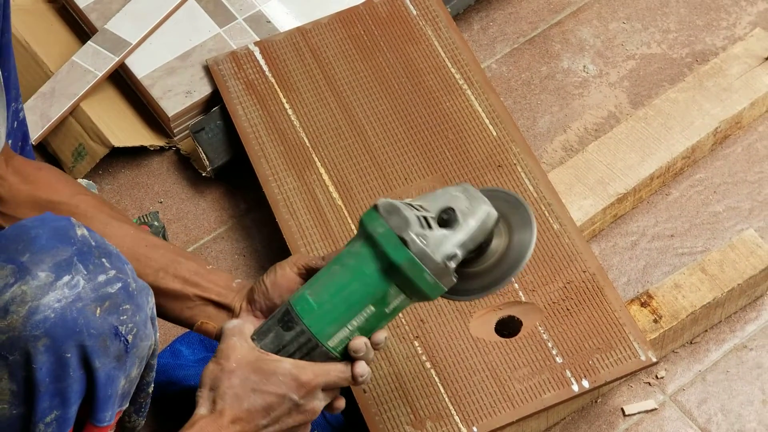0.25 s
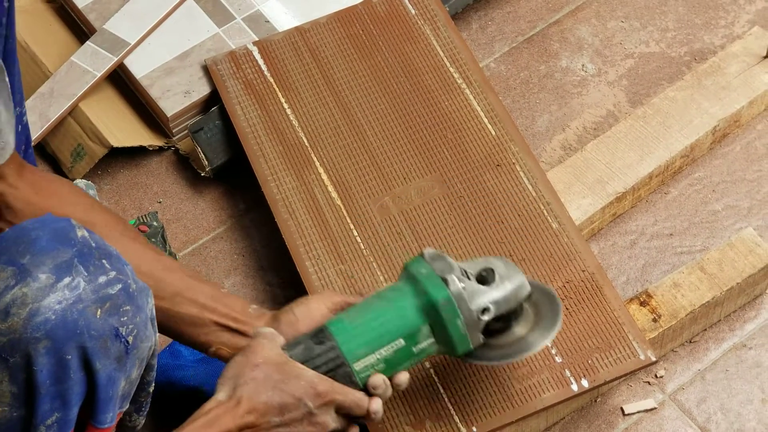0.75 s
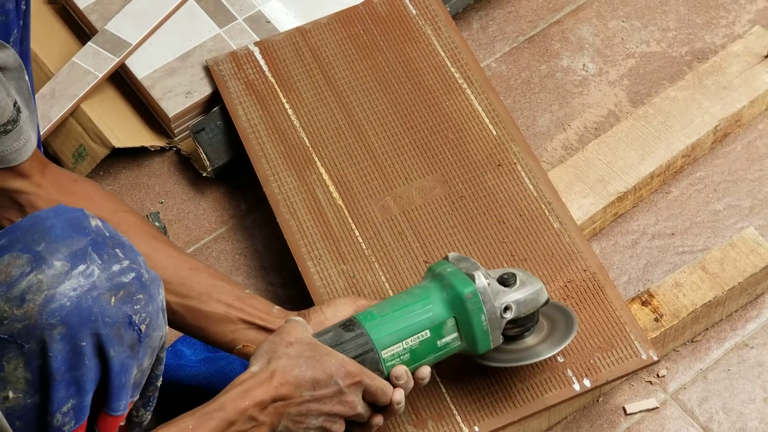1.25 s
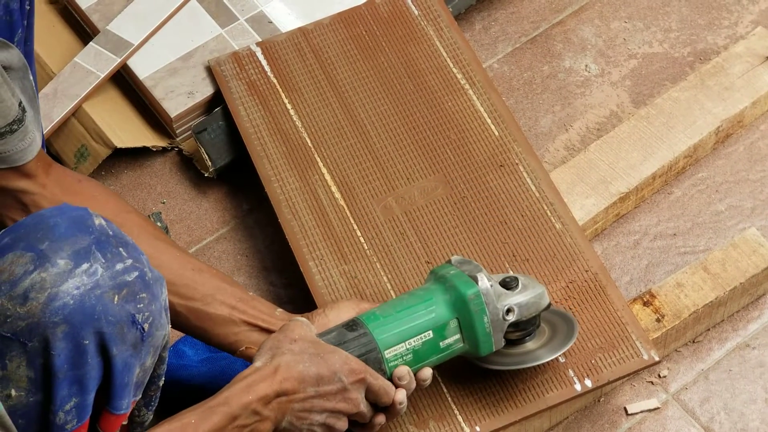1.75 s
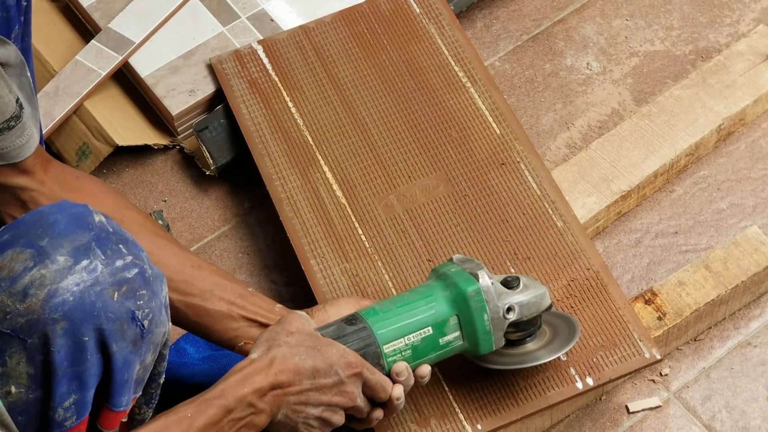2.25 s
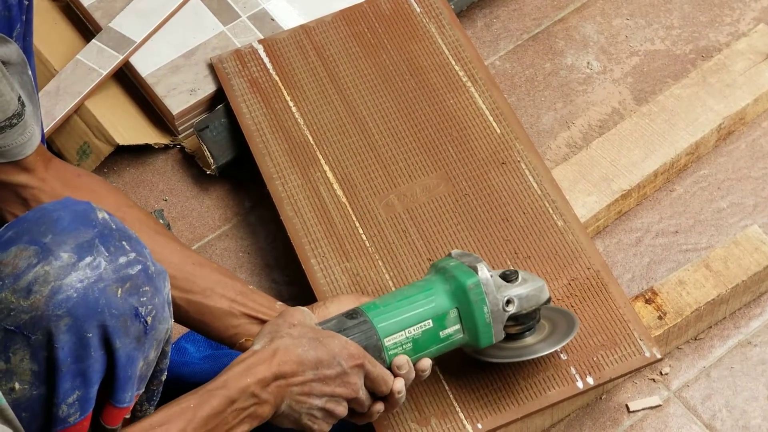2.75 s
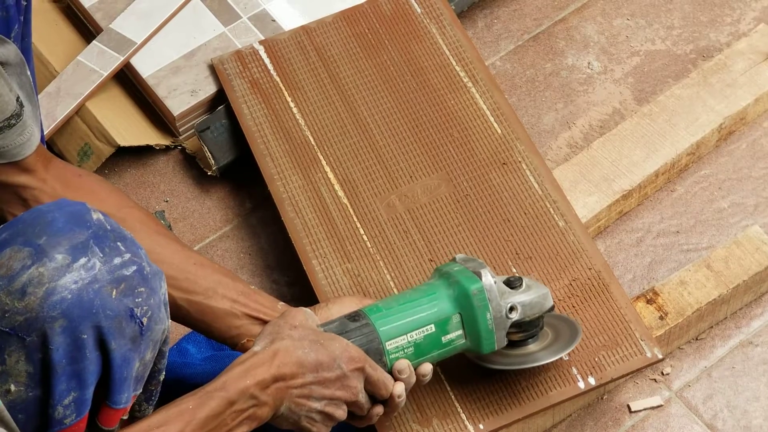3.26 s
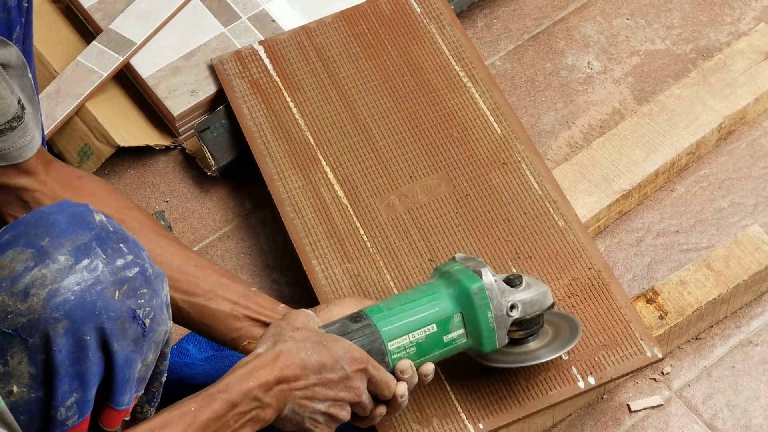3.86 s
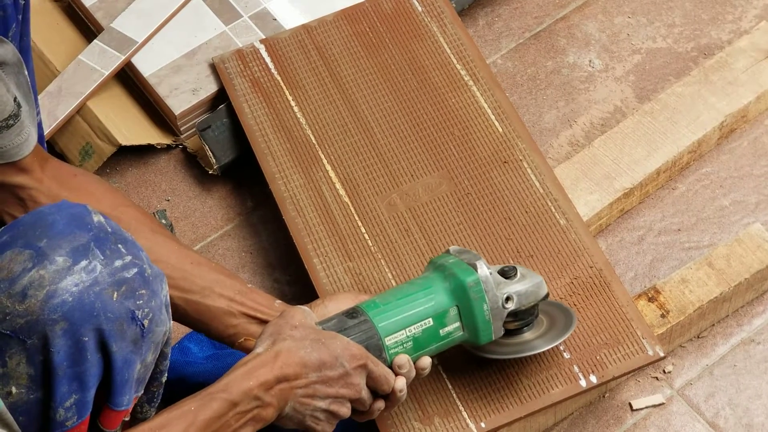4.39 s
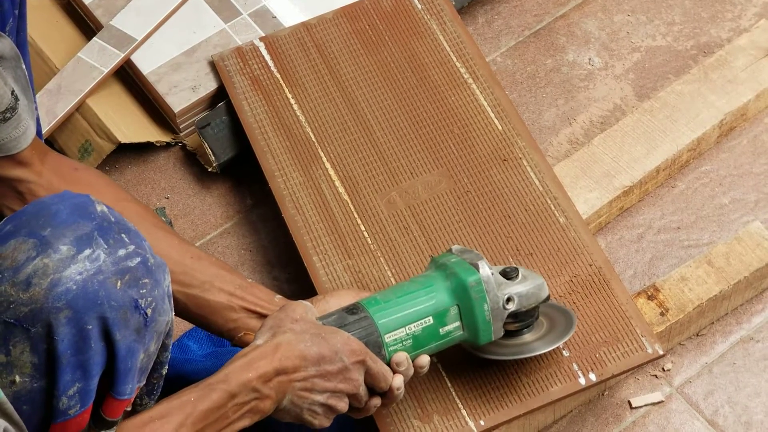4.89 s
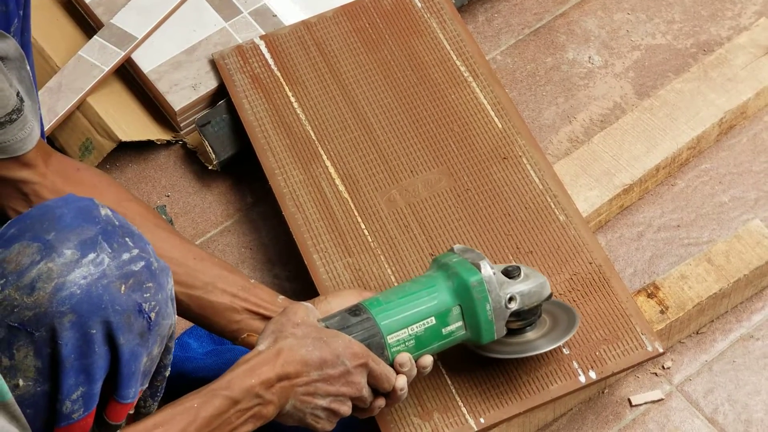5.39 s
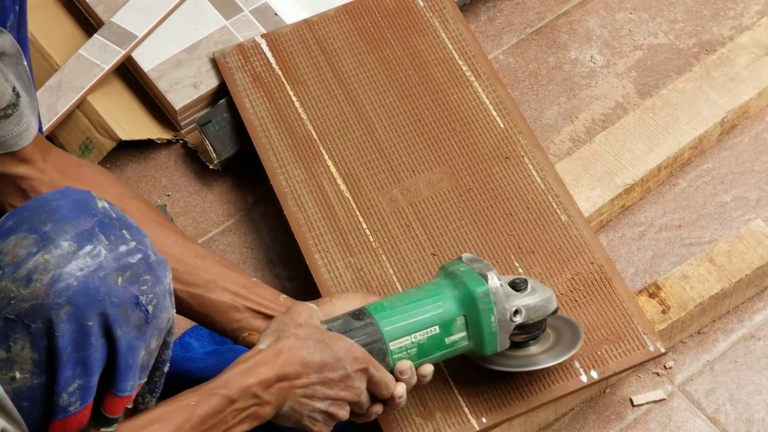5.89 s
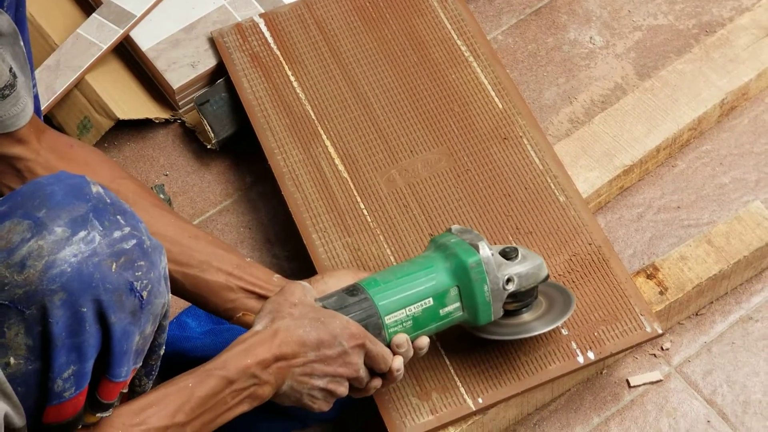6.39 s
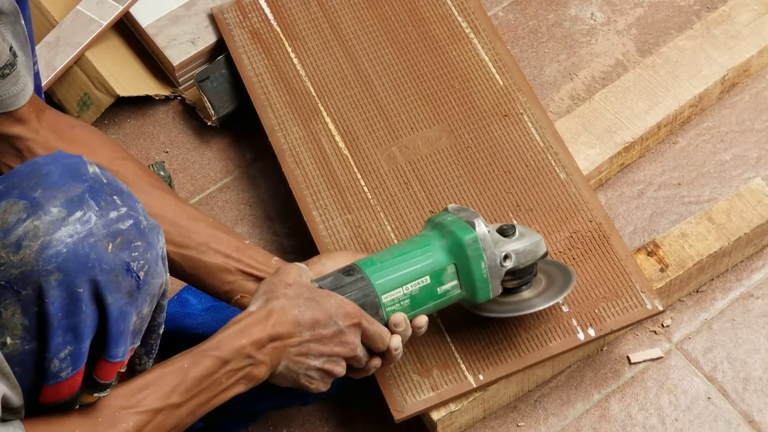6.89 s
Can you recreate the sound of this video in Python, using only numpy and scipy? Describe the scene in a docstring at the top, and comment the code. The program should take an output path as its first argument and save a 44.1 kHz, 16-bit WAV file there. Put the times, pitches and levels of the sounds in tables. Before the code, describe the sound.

Close by, loose gears tick and rattle before an angle grinder kicks on and whines quickly up to speed. After a moment of free running, the disc bites into a ceramic tile in seven passes of uneven length, the last ones short. Each brings bright, gritty scraping, a metallic ring and a faint drone from the tile. The motor sags slightly under load and its fan rushes through the gaps, in a fairly dry space.

```python
"""Angle grinder on a floor tile

A hand-held grinder coasts with rattling gears, is switched on with a knock and spins up.
Its disc is then pressed seven times on a ceramic tile: grit scrapes, the steel disc rings
and the tile judders and drones, while the motor sags under the load and its fan keeps rushing."""
import sys
import numpy as np
from scipy import signal
from scipy.fft import rfft, irfft, next_fast_len
from scipy.io import wavfile

SR = 44100
rng = np.random.default_rng(int(sys.argv[2]) if len(sys.argv) > 2 else 0)


def unload_audio(sound):
    """Save the sound as a 16-bit wav file, at the path given as the first command line argument."""
    columns = np.transpose(np.atleast_2d(sound))
    # keep every value between -1 and 1, then stretch to whole-number steps
    steps = np.round(np.clip(columns, -1, 1) * 32767)
    wavfile.write(sys.argv[1], SR, steps.astype(np.int16))


N = 314874
TIME = np.arange(N) / SR

# Passes over the tile; levels in all tables are relative, set before the mix:
# (lands [s], lifts [s], landing [dB], time to bite [s], scrape [dB], squeal over scrape [dB],
#  skating time [s], judder [dB], bounce over judder [dB], drone [dB], drone loudest at [s])
PASSES = [ (1.448, 2.068, -16, 0.27, -21.5, -19, 0.33, -34, -2.5, -42.5, 1.55),
          (2.37, 3.276, -3, 0.15, -19.5, -9.5, 0.18, -37, 9, -43.5, 3.08),
          (3.569, 3.861, -9, 0.11, -22, -12.5, 0.18, -37, 6, -51, 3.68),
          (4.086, 4.985, -12, 0.18, -20, -5, .42, -36, -2, -41.5, 4.44),
          (5.242, 5.884, -10, 0.072, -19, -8, 0.25, -39.5, 13.5, -40.5, 5.42),
          (6.2983, 6.577, -2, 0.014, -20.5, -6, 0.22, -42, 11, -38, 6.58),
          (6.927, 7.2, -4, 0.01, -20, -9, 0.19, -37.5, 0.5, -70, 6.98), ]
# the hand leans harder on the tool: (time [s], length [s], extra scrape [dB])
PRESSES = [(1.855, 0.14, 2), (3.2, 0.15, 2.5), (3.783, 0.064, 3.5), (4.89, .08, 2), (5.316, 0.023, 1.5),
           (5.77, 0.046, 5.5), (6.518, 0.067, 4.5), (7.046, 0.068, 5)]
# the rim catches on the tile: (time [s], level [dB])
CATCHES = [(1.9592, -5), (4.215, -4), (5.3228, -10)]
# disc speed at work, sagging under load: (time [s], speed [turns/s])
WORK_SPEED = [(1.45, 181.4), (1.7, 182), (2.05, 181.3), (2.35, 183), (2.6, 181.4), (3.0, 181.2),
              (3.3, 178.6), (3.57, 184), (3.87, 179), (4.12, 183), (4.4, 179.6), (4.62, 173.5), (4.86, 170),
              (5.27, 177.6), (5.87, 171.3), (6.38, 181.2), (6.6, 178.3), (6.95, 182)]
# tone of the scraping grit: (frequency [Hz], level [dB])
SCRAPE_SPECTRUM = [(100, -78), (250, -46), (400, -32), (900, -34), (1500, -5.5), (2300, 0), (3000, 1.5),
                   (4400, 14), (5200, 6), (6500, -31.5), (8000, -30.5), (10500, -4.5), (13000, -3.5),
                   (16000, -16)]
# ring of the steel disc: (frequency [Hz], width [Hz], level [dB])
DISC_MODES = [(2243, 37, -18), (2391, 69, -10.5), (3385, 33, -18), (3594, 29, 2), (3815, 35, -4.5),
              (3800, 24, -15), (4254, 85, -7), (4630, 94, -12), (4480, 128, 0.5), (4884, 31, -0.5),
              (5590, 73, 3.5), (6106, 60, -11.5), (6646, 65, -10), (7180, 54, -5.5), (8080, 120, -16.5),
              (8545, 63, -10), (9310, 37, -5), (10040, 98, -15), (10990, 56, -10), (12043, 37, 0.5),
              (13850, 150, -3), (13650, 110, -8.5), (14600, 48, -17), (15024, 45, -13), (15700, 110, -7)]
# squeal of the biting disc: (frequency [Hz], width [Hz], level [dB])
SQUEAL_MODES = [(2210, 110, -4.5), (2390, 49, -11)]
# rasp of the labouring disc: (frequency [Hz], width [Hz], level [dB])
RASP_MODES = [(1463, 43, 2.5), (1637, 50, -0.5)]
# dull ring of the tile on its battens: (frequency [Hz], width [Hz], level [dB])
TILE_MODES = [(339.7, 16.4, -8.5), (475, 22, -11), (536, 8.7, 5), (652, 60, -2.5), (714, 13, -4.5),
              (810, 16, -7), (939, 41, -8), (1025, 41, 4), (1280, 58, 5), (1445, 89, -0.5), (1720, 59, -29)]
# overtones of the disc's wobble: (order [cycles/turn], level [dB])
WOBBLE_ORDERS = [(2, -15.5), (5, -9), (7, -11), (8, -6), (12, -2.5)]
# gear teeth slam together: (time [s], level [dB])
KNOCKS = [(0.0543, -22), (0.1328, -24), (0.2154, -0.5), (0.297, -4), (0.3339, -18), (0.3974, -9),
          (0.5294, -11), (0.57, -10), (0.5774, -2.5), (0.72, -6), (0.7586, -10)]
# rattle of case, pinion and dry clatter, a row each:
# (coasting [dB], sets in [s], attack [s], under torque [dB], release [dB/s], settled [dB])
RATTLES = [(-38, 0.222, 0.033, -21, 50, -55), (-38, 0.348, 0.029, -28, 28, -64),
           (-47, 0.218, 0.034, -34, 23.5, -60)]
# ring of the gear case: (frequency [Hz], width [Hz], level [dB])
CASE_MODES = [(730, 84, -17), (2130, 370, -7), (4264, 120, 6.5), (4380, 100, 6)]
# high ring of the pinion: (frequency [Hz], width [Hz], level [dB])
PINION_MODES = [(12240, 300, 7), (12350, 270, -11), (15470, 410, -11)]
# dull ring of the motor housing: (frequency [Hz], width [Hz], level [dB])
HOUSING_MODES = [(694, 66, -2), (1250, 270, 0), (2000, 650, 5)]
# tone of the dry gear clatter: (frequency [Hz], level [dB])
CLATTER_SPECTRUM = [(40, -20), (200, -23), (400, -14.5), (700, -5.5), (1300, -6.5), (2000, -4.5),
                    (3300, 4.5), (4800, 4), (7000, -4.5), (10500, -8), (12700, -32), (14500, -7),
                    (16000, -6.5)]
# tone of the fan's air: (frequency [Hz], level [dB])
FAN_SPECTRUM = [(40, -42), (100, -41), (200, -34.5), (330, -20.5), (600, -14.5), (1200, -12), (2100, -3),
                (3100, 1.5), (4600, -2.5), (7800, -18), (10500, -18), (12200, -9), (16000, -15)]
# sound common to both microphone ports: (frequency [Hz], share of power [0-1])
STEREO_LIKENESS = [(100, 0.32), (450, 0.75), (1000, 0.71), (2200, 0.52), (4200, 0.77), (8000, 0.23),
                   (13000, 0.34)]
# balance of the ports: (frequency [Hz], left over right [dB])
STEREO_BALANCE = [(60, 2.3), (110, 1.6), (200, 4.3), (380, 5.9), (700, 6.6), (1290, 4.6), (2380, 0.44),
                  (4400, 3.6), (8120, 5.4), (15000, 4.3)]
# phase between the ports: (frequency [Hz], left leads by [rad])
STEREO_PHASE = [(600, .1), (1300, -1), (2000, -.3), (2400, -.8), (2900, 2.4), (3600, 1.5), (4500, .9),
                (6000, 2.3), (6400, -.6), (7600, -2.6), (9300, 1.2), (11500, 0), (12600, 1.8), (14000, .2)]

GEAR_RATIO, MESH_ORDER, THROB_HZ = 3.285, 36, 100
SWITCH_ON_S, TORQUE_EASES_S = .2147, 0.59
COAST_TURNS_PER_S, GAIN_TURNS_PER_S, HALF_GAIN_S = 47, 163, .25
FIRST_TOUCH_DB, LIFT_DB_PER_S = -12.5, 349   # scrape before the disc bites; fade as it lifts
BOUNCE_DECAY_S, JUDDER_LINGERS_S = 0.14, 0.028
RASP_DB, LABOURING_TURNS_PER_S = -13, 166.6   # the rasp would be full at this speed
SKATE_DRONE_DB, BITTEN_DRONE_DB, SKATE_END_S = -43.5, -67.5, 0.022
DRONE_SWELL_DB, DRONE_SWELL_S = 7.5, 0.11
PINION_TICK_S, PINION_TICK_DB = 1, -22.5
WHINE_DB, WHINE_ATTACK_S, WHINE_HOLD_S, WHINE_FALL_DB_PER_S = -20, 0.043, .13, 42
FAN_DB, GEAR_PAN_DB, CUTOFF_HZ = -30, 3.5, 15850


def grinding(speed, turns):
    """Grit sets the steel disc ringing and shakes the tile under it."""
    scrape, squeal, judder = contact()
    touchdowns = [(lands, db) for lands, _, db, *_ in PASSES]
    crunch = noise() * blows(touchdowns + CATCHES, decay_s=0.0066)
    force = scrape * grit(turns, repeat=0.28, rough_db=1.25) + from_db(-10.5) * crunch
    steel = from_db(-2.0) * resonate(force, DISC_MODES, sway_db=1.5)
    steel += from_db(-5.0) * colour(force, SCRAPE_SPECTRUM)
    bite = from_db(-7.5) * squeal * grit(turns, repeat=0.45, rough_db=3.0)
    steel += resonate(bite, SQUEAL_MODES, sway_db=1.0)
    sag = (speed.max() - speed) / (speed.max() - LABOURING_TURNS_PER_S)
    steel += resonate(from_db(RASP_DB) * np.clip(sag, 0, 1) * force, RASP_MODES)
    # a light touch rings brighter than a hard one; the sizzle fades as the edge is ground smooth
    bright_db = 3 - 30 * scrape + np.interp(TIME, [2.8, 6.4], [1.3, -2.5]) + 1.1 * drift(18)
    treble = signal.sosfiltfilt(highpass(7500), steel)
    steel += treble * (from_db(bright_db) - 1)
    shake = from_db(-3.5) * judder * grit(turns, repeat=0.51, rough_db=4.1)
    tile = resonate(shake + from_db(-30) * crunch, TILE_MODES, sway_db=2.5)
    return steel + signal.sosfilt(highpass(280, order=4), tile)


def grit(turns, repeat, rough_db, grains=240):
    """Grains on the rim come round every turn and slowly wear; the rest is fresh chipping."""
    under_rim = (turns % 1 * grains).astype(int)
    rim = rng.standard_normal((2, 3, grains))[:, :, under_rim]
    wear = 2.0 * drift(1.64)
    worn = rim[0] * np.cos(wear) + rim[1] * np.sin(wear)
    pulse = throb(turns + 0.19 * drift(18.0), depth=0.29) * throb(THROB_HZ * TIME, depth=0.091)
    roughness = from_db(rough_db * drift(175) + .9 * drift(25))
    return unit_power(pulse * roughness) * (np.sqrt(repeat) * worn + np.sqrt(1 - repeat) * noise())


def contact():
    """Envelopes of scrape, squeal and judder: the disc bounces, bites in, is leant on and lifts."""
    scrape = squeal = judder = 0
    for lands, lifts, _, bite_s, scrape_db, squeal_db, _, judder_db, bounce_db, _, _ in PASSES:
        age = np.maximum(TIME - lands, 0)
        touch_db = FIRST_TOUCH_DB * np.maximum(1 - age / bite_s, 0)
        cut = held(lands, lifts) * from_db(scrape_db + touch_db)
        scrape += cut
        squeal += cut * from_db(squeal_db)
        shake_db = judder_db + bounce_db * np.exp(-age / BOUNCE_DECAY_S)
        judder += held(lands, lifts + JUDDER_LINGERS_S) * from_db(shake_db)
    lean = from_db(sum(db * swell(s, length / 2) for s, length, db in PRESSES))
    return scrape * lean, squeal * lean, judder


def drone(turns):
    """The wobbling disc hums on the tile: fourth order as it skates, third order as it cuts."""
    third = fourth = 0
    for lands, lifts, _, _, _, _, skate_s, _, _, drone_db, loudest in PASSES:
        down = held(lands, lifts + JUDDER_LINGERS_S)
        skating = (1 - np.tanh((TIME - lands - skate_s) / SKATE_END_S)) / 2
        third += down * from_db(drone_db + DRONE_SWELL_DB * (swell(loudest, DRONE_SWELL_S) - 1))
        fourth += down * from_db(BITTEN_DRONE_DB + skating * (SKATE_DRONE_DB - BITTEN_DRONE_DB))
    phase = 2 * np.pi * turns
    wobble = hum = 0
    for order, db in WOBBLE_ORDERS:
        wobble += from_db(db + 3.1 * drift(5.9)) * np.sin(order * phase + .5 * drift(5.7))
    for order, gain in [(3, third), (4, fourth)]:
        hum += gain * from_db(4.0 + 0.64 * drift(8.6)) * np.sin(order * phase + 1.1 * drift(4.5))
    _, _, judder = contact()
    return straight_only(from_db(-4.5) * judder * wobble + hum)


def gears(turns):
    """Loose teeth knock and rattle in rapid bursts; the jolt of switch-on kicks the housing."""
    case_gain, pinion_gain, clatter_gain = [rattle_gain(*part) for part in RATTLES]
    pinion_gain += blows([(PINION_TICK_S, PINION_TICK_DB)], decay_s=0.013)
    # how strongly the rattle pulses at 100 Hz
    throb_depth = 0.44 * np.interp(TIME, [.211, .215, .6, .9], [1.0, 0.75, 0.6, 0.85])
    pulse = throb(THROB_HZ * TIME + 0.33 * drift(7.5) + 0.39, throb_depth)
    bursts = unit_power(pulse * from_db(2.0 * drift(130)))
    slams = noise() * blows(KNOCKS, decay_s=0.0018)
    teeth = noise() * bursts
    # the case rings most while the mesh sweeps through its modes
    in_tune = np.interp(TIME, [.3, .38, .75, .95], [0.78, 1, 0.88, 0.37])
    case = resonate(from_db(-3.0) * teeth * case_gain * in_tune + from_db(-10.0) * slams, CASE_MODES)
    pinion = resonate(teeth * pinion_gain + from_db(-30) * slams, PINION_MODES)
    clatter = colour(from_db(7.5) * noise() * bursts * clatter_gain, CLATTER_SPECTRUM)
    kick = resonate(noise() * blows([(SWITCH_ON_S, -13)], decay_s=0.0017), HOUSING_MODES)
    return case + pinion + clatter + kick + bursts * whine(turns)


def rattle_gain(coast_db, starts, attack_s, full_db, release_db_per_s, settled_db):
    """Slack teeth rattle lightly while coasting, hard under torque, and settle as it eases."""
    attack = np.clip((TIME - starts) / attack_s, 0, 1)
    eased_db = release_db_per_s * np.maximum(TIME - TORQUE_EASES_S, 0)
    driven_db = np.maximum(full_db - eased_db, settled_db)
    return from_db(coast_db + attack * (driven_db - coast_db))


def whine(turns):
    """Meshing teeth give a rasping whine, loudest while the motor pulls hardest."""
    age = TIME - SWITCH_ON_S
    attack = np.clip(age / WHINE_ATTACK_S, 0, 1)
    level_db = WHINE_DB - WHINE_FALL_DB_PER_S * np.maximum(age - WHINE_HOLD_S, 0)
    jitter = np.array([drift(147) for path in range(3)])
    return attack * from_db(level_db) * np.sin(2 * np.pi * MESH_ORDER * turns + 1.8 * jitter)


def motor(speed, turns):
    """Fan air grows with speed and throbs with mains and rotor; the rotor hums."""
    pace, rotor = speed / speed.max(), GEAR_RATIO * turns
    pulse = throb(THROB_HZ * TIME, depth=0.084) * throb(rotor, depth=0.41)
    air = colour(noise() * pulse * from_db(1.5 * drift(15)), FAN_SPECTRUM)
    # the vents turn away as the tool is lowered
    vents_db = np.interp(TIME, [.3, .9, 1.3, 2.2, 3.5, 6.8], [0.76, 3.5, 2.5, 3.0, 0.85, 0.21])
    hum = from_db(-49.5 + 3.9 * drift(27.0)) * np.sin(2 * np.pi * rotor)
    return from_db(FAN_DB + vents_db) * pace ** 0.89 * air + straight_only(hum * pace ** 3)


def shaft_speed():
    """Turns per second: the disc coasts, spins up ever more slowly, then is held back by the work."""
    age = np.maximum(TIME - SWITCH_ON_S, 0)
    free_speed = COAST_TURNS_PER_S + GAIN_TURNS_PER_S * age / (age + HALF_GAIN_S)
    return np.minimum(free_speed, np.interp(TIME, *np.transpose(WORK_SPEED)))


def reflections(paths, t60, wet_db):
    """Each path carries a short, thin echo from the floor and walls."""
    age = TIME[:SR // 2]
    tail = rng.standard_normal((3, len(age))) * from_db(-60 * age / t60) * (age > .003)
    tail /= np.sqrt(np.sum(tail ** 2) / len(tail))
    tail = signal.sosfilt(highpass(1200), tail)
    return paths + from_db(wet_db) * signal.fftconvolve(paths, tail, axes=1)[:, :N]


def stereo(paths):
    """Straight sound reaches two microphone ports out of step; each gets its own scattered sound."""
    alike = at_hz(STEREO_LIKENESS)
    spectra = rfft(paths, 2 * (len(alike) - 1))
    sides = np.array([[1], [-1]]) / 2
    straight = np.sqrt(alike) * spectra[0] * np.exp(1j * sides * at_hz(STEREO_PHASE))
    scattered = np.sqrt(1 - alike) * spectra[1:]
    return irfft((straight + scattered) * from_db(sides * at_hz(STEREO_BALANCE)))[:, :N]


def resonate(x, modes, sway_db=0):
    """Parallel resonances of unit power; with sway, each waxes and wanes as the contact moves."""
    out, power = 0, 0
    for hz, width, db in modes:
        radius = np.exp(-np.pi * width / SR)
        gain = from_db(db) * (1 - radius ** 2) / 2
        poles = [1, -2 * radius * np.cos(2 * np.pi * hz / SR), radius ** 2]
        drive = x * unit_power(from_db(sway_db * drift(4.6))) + 1e-18
        out += signal.lfilter([gain, 0, -gain], poles, drive)
        power += gain * from_db(db)
    return out / np.sqrt(power)


def colour(x, spectrum):
    """Minimum-phase EQ that keeps the power of white noise."""
    gain = unit_power(from_db(at_hz(spectrum)))
    cepstrum = irfft(np.log(gain))
    size = len(cepstrum)
    cepstrum[1:size // 2] *= 2
    cepstrum[size // 2 + 1:] = 0
    return irfft(rfft(x, size) * np.exp(rfft(cepstrum)))[..., :N]


def highpass(hz, order=2):
    """Sections of a low-cut filter."""
    return signal.butter(order, hz, "high", fs=SR, output="sos")


def at_hz(points):
    """A frequency curve on the padded FFT grid."""
    hz, value = np.transpose(points)
    grid = np.linspace(1, SR / 2, next_fast_len(N // 2 + 4096) + 1)
    return np.interp(np.log(grid), np.log(hz), value)


def noise():
    """White noise along three paths: straight, scattered left, scattered right."""
    return rng.standard_normal((3, N))


def straight_only(x):
    """Send a tone down the straight path alone."""
    return x * [[1], [0], [0]]


def drift(rate_hz):
    """Smooth random wander of unit power."""
    pole = np.exp(-40 * np.pi * rate_hz / SR)   # runs at a twentieth of the sample rate
    slow = signal.lfilter([1], [1, -2 * pole, pole * pole], rng.standard_normal(N // 20 + 4002))[4000:]
    return np.interp(np.arange(N) / 20, np.arange(len(slow)), unit_power(slow))


def held(lands, lifts):
    """Envelope of one pass: quick attack, hold, steady fall in dB."""
    attack = np.clip((TIME - lands) / .014 + .75, 0, 1)
    return attack * from_db(-LIFT_DB_PER_S * np.maximum(TIME - lifts, 0))


def blows(events, decay_s):
    """Envelope of sharp hits that die fast."""
    out = np.zeros(N)
    for s, db in events:
        start = int(s * SR)
        age = TIME[:min(N - start, SR // 10)]
        out[start:start + len(age)] += from_db(db) * np.exp(-age / decay_s)
    return out


def throb(cycles, depth):
    """A swell once a cycle, of unit power."""
    return unit_power(np.exp(depth * np.cos(2 * np.pi * cycles)))


def swell(centre, width):
    """A smooth bump of height 1."""
    return np.exp(-((TIME - centre) / width) ** 2)


def from_db(db):
    """Decibels to gain."""
    return 10 ** (np.asarray(db) / 20)


def unit_power(x):
    """Scale to an RMS of 1."""
    return x / np.sqrt(np.mean(x ** 2) + 1e-20)


def scene():
    """One shaft speed drives gears, fan and disc; the gear case faces left."""
    speed = shaft_speed()
    turns = np.cumsum(speed) / SR
    rattle = reflections(gears(turns), t60=0.13, wet_db=-7.0)
    cutting = reflections(motor(speed, turns) + grinding(speed, turns), t60=0.12, wet_db=-5)
    gear_pan = from_db([[GEAR_PAN_DB], [-GEAR_PAN_DB]])
    return stereo(rattle) * gear_pan + stereo(cutting + drone(turns))


def record(dry):
    """A soft clip rounds the highest peaks and a steep low-pass cuts the top."""
    rounded = dry / (1 + (dry / .88) ** 8) ** .125
    lowpass = signal.ellip(12, .1, 90, CUTOFF_HZ, fs=SR, output="sos")
    return signal.sosfilt(lowpass, rounded)


dry = scene()
out = record(dry)
unload_audio(out)
```